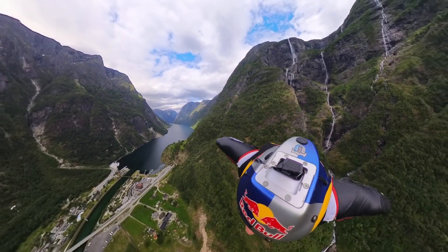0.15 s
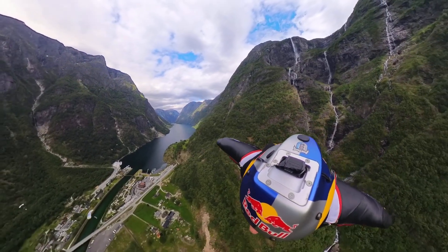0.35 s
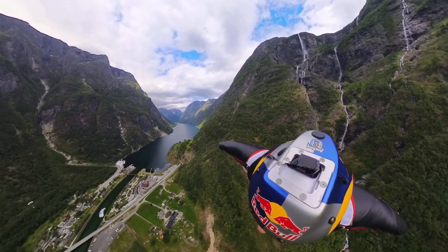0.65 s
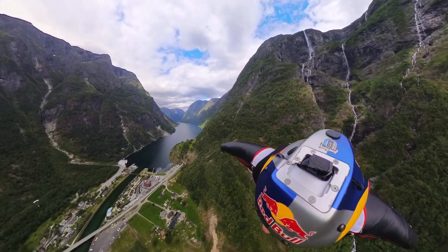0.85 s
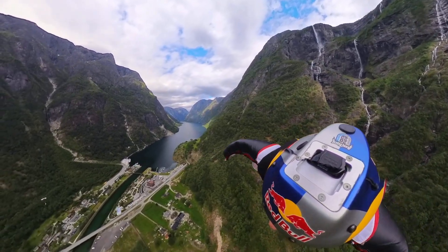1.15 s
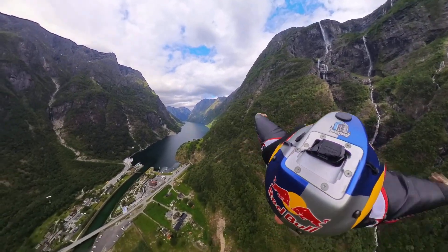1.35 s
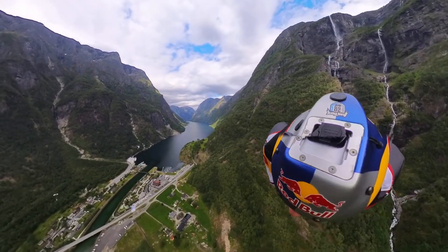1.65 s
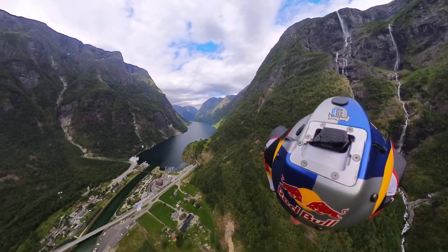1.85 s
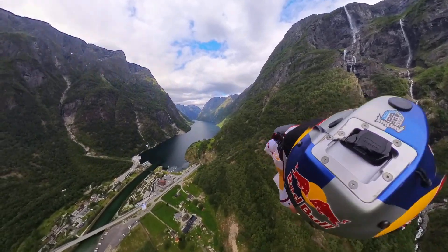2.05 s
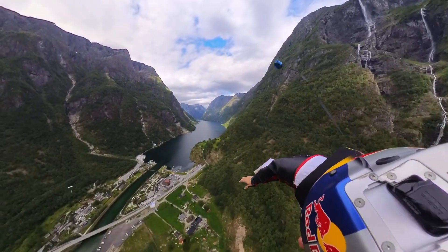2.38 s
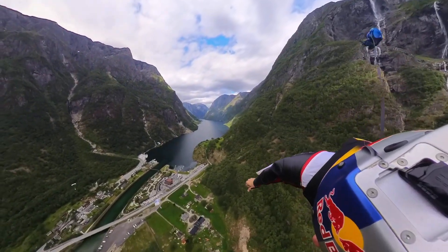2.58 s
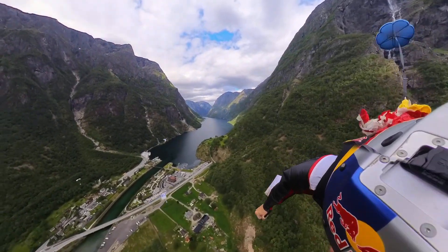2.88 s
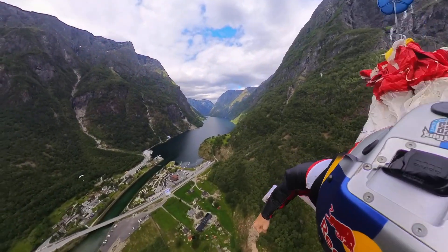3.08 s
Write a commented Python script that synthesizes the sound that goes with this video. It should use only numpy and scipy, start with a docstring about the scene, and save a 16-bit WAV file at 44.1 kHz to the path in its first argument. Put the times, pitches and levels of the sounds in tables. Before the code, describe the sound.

Wind tears past a helmet microphone in open flight, swells to a roar, then abruptly becomes a muffled, throbbing rumble; a short blast follows, then low buffeting, tiny line ticks and snapping parachute cloth.

```python
"""Air tears past a helmet microphone in a wingsuit flight: a bright rush swells to a roar, then drops to a
muffled, throbbing rumble. As the flyer turns to throw the pilot chute the airstream hits the ports in a
short burst and falls away. Slow buffeting follows; lines tick and the canopy rustles and snaps out of its
pack. The air is coloured noise in lumps, the throb a wandering sine, the cloth and lines short clicks."""
import sys
import numpy as np
from scipy import signal
from scipy.fft import rfft, irfft
from scipy.io import wavfile
from scipy.ndimage import uniform_filter1d, map_coordinates

SR = 44100
rng = np.random.default_rng(int(sys.argv[2]) if len(sys.argv) > 2 else 0)


def digitize_waveform(pressure):
    """Quantize a signal to 16-bit integers and store it at the path in sys.argv[1].

    Rows of a 2-D input are taken as channels; values are limited to [-1, 1].
    """
    field = np.atleast_2d(pressure).T
    bounded = np.clip(field, -1, 1)
    quanta = np.round(bounded * 32767).astype(np.int16)
    wavfile.write(sys.argv[1], SR, quanta)


N = 142002
T = np.arange(N) / SR
FREQS = np.maximum(np.arange(N // 2 + 1) * SR / N, 1)

# Every "colour" table is the outline of a filter: relative level against frequency.


def open_wind():
    """Full airstream on the ports: broadband turbulence with a swirling hiss near 4 kHz, deepening to a roar."""
    # airstream level at the ports [t/s, level/dB]
    rush_levels = [(0, -20), (.4, -19), (.735, -19.5), (.765, -21), (.79, -24), (.816, -27.5),
                   (.824, -19.5), (.844, -16.5), (.87, -25.5), (.968, -30.5), (.985, -83.5)]
    hiss_levels = [(0, -32), (.45, -33), (.58, -31), (.66, -28), (.75, -31.5), (.775, -39), (.815, -81),
                   (.845, -26), (.87, -57), (.95, -90)]
    roar_levels = [(.76, -36), (.795, -30), (.817, -29), (.828, -25), (.84, -17.5), (.88, -15.5),
                   (.912, -19), (.927, -19.5), (.969, -20.5), (.978, -33), (.99, -35)]
    # airstream colour [f/Hz, level/dB]
    rush_colour = [(20, -39), (45, -9), (95, -7), (165, 4.5), (300, -3.5), (550, -7.5), (1150, -14),
                   (1600, -22.5), (2400, -21), (4300, -25), (6000, -34), (8500, -40.5), (12500, -37.5),
                   (16000, -44.5)]
    hiss_colour = [(1500, -8.5), (2900, -4.5), (3800, 4), (4450, -2), (5300, -16.5), (7000, -42),
                   (12000, -51)]
    roar_colour = [(20, -35.5), (100, -10.5), (160, -1.5), (400, 1.5), (700, 0.5), (1300, -5), (1600, -11),
                   (2100, -14), (2800, -22), (4500, -27.5), (7000, -39.5), (14000, -47.5), (16000, -72)]
    # centre the port hiss swirls about, sinking as the head turns [t/s, f/Hz]
    hiss_pitch = [(0, 4098), (.3, 4014), (.55, 4102), (.66, 3838), (.76, 3567), (.85, 3450)]

    rush = turbulence(rush_colour, lump_db=1.5, lump_rate=350, steady_s=0.015, width_db=-0.5)
    hiss = turbulence(hiss_colour, lump_db=4.0, lump_rate=38, steady_s=0.013, width_db=-25)
    roar = turbulence(roar_colour, lump_db=1.3, lump_rate=160, steady_s=0.013, width_db=0.5)
    centre_ratio = np.interp(T, *np.transpose(hiss_pitch)) / 3985  # Hz over Hz
    swirl = np.exp(0.05 * drift(12))  # about 5 % either way
    hiss = bend(hiss, centre_ratio * swirl)
    return level(rush_levels) * rush + level(hiss_levels) * hiss + level(roar_levels) * roar


def sheltered_wind():
    """Dull turbulence in the lee of the helmet, with short gusts curling round its edge and a faint hiss."""
    # dull rumble in the lee [t/s, level/dB]
    rumble_levels = [(.955, -55), (.985, -16.5), (1.07, -22), (1.2, -21), (1.45, -22.5), (1.58, -24.5),
                     (1.66, -28.5), (1.73, -26.5), (1.785, -21.5), (1.85, -24.5), (2.0, -21), (2.15, -18),
                     (2.3, -20), (2.425, -16), (2.445, -36), (2.5, -39.5), (2.6, -54)]
    # separate low-mid gusts [t/s, half length/s, level/dB]
    gust_swells = [(1.097, 0.031, -33.5), (1.178, .025, -28.5), (1.342, 0.023, -31), (1.42, 0.043, -27),
                   (1.545, 0.039, -27.5), (1.632, 0.032, -32), (1.767, 0.035, -30.5), (1.9, 0.012, -30),
                   (2.223, .02, -24)]
    # faint high hiss of air sliding over the helmet [t/s, level/dB]
    skin_levels = [(.97, -67), (1.1, -65), (1.4, -66), (1.68, -67.5), (1.9, -70), (2.2, -68.5), (2.42, -71),
                   (2.45, -85)]
    # colour of rumble, gusts and hiss [f/Hz, level/dB]
    rumble_colour = [(20, -33.5), (50, -8), (90, 1), (170, 4.5), (280, -1.5), (480, -8.5), (700, -15.5),
                     (1000, -25), (1400, -33.5), (1600, -42), (2100, -43.5), (3000, -54), (6500, -64),
                     (16000, -67.5)]
    gust_colour = [(120, -27.5), (280, -8), (400, 6.5), (600, -6.5), (800, -20), (1400, -32), (3000, -62),
                   (9000, -91.5)]
    skin_colour = [(1200, -12), (2500, -2), (4200, -3.5), (6500, -8), (16000, -10)]

    rumble = turbulence(rumble_colour, lump_db=0.5, lump_rate=55, steady_s=0.02, width_db=1.0)
    gusts = turbulence(gust_colour, lump_db=3.0, lump_rate=100, steady_s=0.014, width_db=1.5)
    skin = turbulence(skin_colour, lump_db=1.5, lump_rate=90, steady_s=0.04, width_db=-1.0)
    swells = np.zeros(N)
    for centre_s, half_s, db in gust_swells:
        swells += from_db(db) * np.exp(-0.5 * ((T - centre_s) / half_s) ** 2)
    return level(rumble_levels) * rumble + swells * gusts + level(skin_levels) * skin


def eddy_throb():
    """Nearly regular vortex shedding by the helmet: a low tone, unsteady in pitch and level."""
    # shed eddies: pitch before wander, level before the overall lift [t/s, f/Hz, level/dB]
    eddies = [(.94, 151.9, -40), (.985, 148.8, -22.5), (1.072, 138.7, -17), (1.12, 124.5, -29),
              (1.24, 131.6, -18.5), (1.4, 121.4, -27.5), (1.5, 134.4, -18.5), (1.551, 125.2, -31),
              (1.618, 118.5, -19.5), (1.698, 104.4, -22.5), (1.765, 117.9, -24), (1.805, 142, -25.5),
              (1.86, 114, -17), (1.91, 129.4, -24), (1.979, 125.6, -22), (2.024, 110.6, -20),
              (2.069, 123, -19.5), (2.15, 118.6, -24.5), (2.231, 133.4, -20), (2.31, 166.6, -30),
              (2.358, 143.3, -38), (2.425, 138.6, -18), (2.446, 131.5, -35)]
    s, hz, db = np.transpose(eddies)
    wander = np.exp(0.15 * drift(44.1))
    phase = 2 * np.pi * np.cumsum(np.interp(T, s, hz) * wander) / SR
    swing = rms_one(from_db(3 * np.tanh(drift(29))))
    tone = np.sqrt(2) * np.sin(phase)  # unit power
    lift = from_db(2)
    return lift * level(np.c_[s, db]) * swing * tone


def burst():
    """The airstream sweeps across the ports during the throw: fine spray of hiss, then the full blast."""
    # burst level [t/s, level/dB]
    spray_levels = [(2.21, -86), (2.232, -54.5), (2.275, -41.5), (2.31, -46.5), (2.317, -33.5),
                    (2.338, -30.5), (2.352, -37.5), (2.39, -49), (2.41, -68)]
    blast_levels = [(2.23, -75), (2.28, -32.5), (2.305, -31.5), (2.33, -17.5), (2.358, -16.5),
                    (2.39, -17.5), (2.406, -24.5), (2.424, -27), (2.44, -40), (2.465, -60.5)]
    # burst colour [f/Hz, level/dB]
    spray_colour = [(500, -30), (2000, -8), (4000, 3), (7000, 1.5), (10000, 0), (15500, -1)]
    blast_colour = [(20, -12), (90, -14.5), (180, 7), (500, -0.5), (1300, -8.5), (1600, -12.5),
                    (2700, -16.5), (4200, -25), (7000, -36), (16000, -62)]
    # the blast darkens as the airstream slides off the ports [t/s, pitch ratio]
    blast_sink = [(2.33, 1.08), (2.39, 1.0), (2.405, .84), (2.44, 0.77)]

    spray = turbulence(spray_colour, lump_db=1.5, lump_rate=300, steady_s=0.02, width_db=-11.5)
    blast = turbulence(blast_colour, lump_db=2.5, lump_rate=180, steady_s=0.023, width_db=-1.0)
    blast = bend(blast, np.interp(T, *np.transpose(blast_sink)))
    return level(spray_levels) * spray + level(blast_levels) * blast


def wake():
    """Deep buffeting turbulence and the low flutter of the suit as the body swings upright."""
    # wake level [t/s, level/dB]
    buffet_levels = [(2.43, -37), (2.49, -38), (2.54, -22.5), (2.65, -24.5), (2.76, -27), (2.87, -18),
                     (2.93, -30), (2.98, -22.5), (3.05, -22.5), (3.12, -33), (3.185, -12.5), (3.22, -18)]
    flutter_levels = [(2.43, -63), (2.495, -34), (2.508, -29), (2.57, -25), (2.61, -22), (2.75, -16),
                      (2.8, -19), (2.86, -19.5), (2.93, -21), (2.97, -15), (3.01, -21.5), (3.11, -18),
                      (3.16, -15.5), (3.22, -24)]
    # wake colour [f/Hz, level/dB]
    buffet_colour = [(20, -30), (38, -1), (55, -2), (90, -6.5), (160, -24.5), (400, -33), (2000, -89.5),
                     (8000, -120)]
    flutter_colour = [(40, -21), (100, -1.5), (150, 4.5), (220, -4.5), (300, -14.5), (450, -24.5),
                      (800, -38.5), (1400, -52), (1700, -57), (3000, -73), (5000, -82), (8000, -97),
                      (12000, -115)]

    buffet = turbulence(buffet_colour, lump_db=2.0, lump_rate=41, steady_s=0.08, width_db=7.0)
    flutter = turbulence(flutter_colour, lump_db=2.5, lump_rate=64, steady_s=0.024, width_db=-2.0)
    return level(buffet_levels) * buffet + level(flutter_levels) * flutter


def canopy():
    """Cloth crackles out of the pack as creases open, and folds snap taut with a bright edge and a body."""
    # canopy fabric before its uneven flapping [t/s, level/dB]
    rustle_levels = [(2.91, -54.5), (2.94, -48.5), (2.995, -51), (3.01, -37.5), (3.047, -39), (3.058, -34),
                     (3.072, -37), (3.11, -29), (3.16, -29), (3.22, -25.5)]
    # folds snapping taut: click level before colour [t/s, level/dB, body relative to edge/dB]
    snaps = [(2.975, -35.5, -11), (2.996, -33, -10), (3.0018, -23, 0.5), (3.0052, -19, 4.5),
             (3.010, -21, 5.5), (3.0215, -21.5, 6), (3.0278, -20, 7.5), (3.0305, -22, 1.5),
             (3.039, -18.5, 6.5), (3.0427, -27.5, 2), (3.0572, -17, 5), (3.062, -16.5, 4.5),
             (3.0682, -21.5, -2), (3.0762, -22.5, -4), (3.085, -18, 2), (3.1003, -17.5, 4.5),
             (3.1485, -19, 3.5), (3.155, -19.5, -1), (3.1632, -16, -5), (3.185, -17, 5.5),
             (3.1965, -12.5, 1.5), (3.21, -16, 7)]
    # cloth colour [f/Hz, level/dB]
    rustle_colour = [(150, -0.5), (550, 0), (900, -6.5), (1400, -9), (1600, -17), (2200, -16.5),
                     (4200, -24.5), (7000, -41.5), (10000, -65.5), (16000, -91)]
    snap_colour = [(200, 4), (900, 7), (2000, 0), (5000, -10.5), (7000, -30.5), (9500, -39), (16000, -77)]

    s, db, body_db = np.transpose(snaps)
    split_hz = 2910  # body below, edge above
    above = signal.butter(3, split_hz, "high", fs=SR, output="sos")
    below = signal.butter(3, split_hz, "low", fs=SR, output="sos")
    edge = signal.sosfilt(above, crack(s, db, snap_colour))
    body = signal.sosfilt(below, crack(s, db + body_db, snap_colour))

    rustle = crackle(rustle_colour, per_s=650, spread_db=2.5, hiss_db=-1.5, width_db=2.5)
    flapping = rms_one(from_db(2.5 * np.tanh(drift(60))))  # the unfolding cloth flaps unevenly
    return edge + body + level(rustle_levels) * rustle * flapping


def lines():
    """The bridle pays out with a fine ticking of lines and fabric; single lines pull free with bright clicks."""
    # faint ticking [t/s, level/dB]
    ticking_levels = [(2.47, -88), (2.56, -78), (2.66, -75), (2.9, -74), (2.95, -70.5), (3.0, -69.5)]
    # thin ticks of lines pulling free: click level before colour [t/s, level/dB]
    line_ticks = [(2.555, -52), (2.602, -48.5), (2.6557, -38.5), (2.6755, -45), (2.717, -39),
                  (2.8455, -39.5), (2.9393, -38.5), (2.9553, -30), (3.0172, -26.5), (3.126, -22.5)]
    # colour of the ticking and of the single lines [f/Hz, level/dB]
    tick_colour = [(800, -24), (2500, 0), (4800, 0), (6500, -9), (8000, -20), (12000, -43)]
    line_colour = [(1000, -29), (2600, -8.5), (4000, 1), (5500, -5), (7000, -11.5), (9000, -20.5),
                   (12000, -45), (16000, -70)]

    ticking = crackle(tick_colour, per_s=170, spread_db=2.5, hiss_db=3.0, width_db=1.5)
    return level(ticking_levels) * ticking + crack(*np.transpose(line_ticks), line_colour)


def turbulence(colour, lump_db, lump_rate, steady_s, width_db):
    """Noise in quick lumps as eddies cross the ports; its power, smoothed over about steady_s, is held near 1."""
    lumps = from_db(lump_db * np.clip(drift(lump_rate), -2.5, 2.5))
    mid, side = rng.standard_normal((2, N)) * lumps
    air = coloured(stereo(mid, side, width_db), colour)
    size = max(int(steady_s * SR), 2)
    power = np.mean(air ** 2, axis=0)
    for _ in range(2):
        power = uniform_filter1d(power, size)
    return air / np.sqrt(power + 1e-20)


def crack(s, db, colour):
    """A sharp click with a short, decaying crackle at each time, as tension is released."""
    clicks = np.zeros(N)
    clicks[np.clip((s * SR).astype(int), 0, N - 1)] = from_db(db)
    decay_s = 0.00023
    decay = signal.lfilter([1], [1, -np.exp(-1 / (decay_s * SR))], clicks + 1e-18)
    grain = 0.15 * decay * rng.standard_normal((2, N))
    mid, side = 2 * clicks + grain
    side = side * rng.choice([-1, 1], N)  # each click leans to either port
    return coloured(stereo(mid, side, width_db=-4.0), colour)


def crackle(colour, per_s, spread_db, hiss_db, width_db):
    """Separate tiny clicks of uneven size at random times over a hiss; unit power."""
    born = rng.random(N) < per_s / SR
    sizes = from_db(spread_db * np.clip(rng.standard_normal(N), -2, 1.5))
    clicks = rms_one(born * sizes) * rng.choice([-1, 1], (2, N))
    hiss = from_db(hiss_db) * rng.standard_normal((2, N))
    mid, side = clicks + hiss
    return rms_one(coloured(stereo(mid, side, width_db), colour))


def stereo(mid, side, width_db):
    """Two close microphone ports: alike in the bass, apart in the treble."""
    # spacing of the ports, before width_db is added [f/Hz, side minus mid/dB]
    port_width = [(2950, -72.5), (3150, -3.5), (4500, -7.5), (6000, -5), (8500, -0.5), (13000, -2.5)]
    return mid + from_db(width_db) * coloured(side, port_width) * np.array([[1], [-1]])


def bend(x, ratio):
    """Shift every frequency of a stereo noise by a changing ratio, by reading it faster or slower."""
    place = np.cumsum(ratio) % (N - 1)
    return np.array([map_coordinates(port, [place], order=3) for port in x])


def coloured(x, colour):
    """Filter by an outline of (Hz, dB) points joined along log frequency."""
    hz, db = np.transpose(colour)
    gain = from_db(np.interp(np.log(FREQS), np.log(hz), db))
    return irfft(rfft(x) * gain, N)


def drift(rate):
    """Smooth random motion of unit power: noise whose spectrum falls to half at rate (Hz)."""
    spectrum = rfft(rng.standard_normal(N))
    return rms_one(irfft(spectrum / (1 + (FREQS / rate) ** 2), N))


def level(rows):
    """Gain from (s, dB) rows, dying away at 1 dB per ms outside them, down by 150 dB at most."""
    s, db = np.transpose(rows)
    outside_s = np.abs(T - np.clip(T, s.min(), s.max()))
    return from_db(np.interp(T, s, db) - np.minimum(1000 * outside_s, 150))


def rms_one(x):
    """Scale to unit power."""
    return x / np.sqrt(np.mean(x ** 2) + 1e-20)


def from_db(db):
    """Decibels to gain."""
    return 10 ** (np.asarray(db) / 20)


def scene():
    """All of the air and cloth at the helmet."""
    return open_wind() + sheltered_wind() + eddy_throb() + burst() + wake() + canopy() + lines()


def record(dry):
    """The recorder rounds the highest peaks toward a ceiling and cuts the top steeply."""
    ceiling, cutoff_hz = 0.63, 15800
    rounded = dry / (1 + (dry / ceiling) ** 6) ** (1 / 6)
    lowpass = signal.ellip(12, 0.1, 80, cutoff_hz, fs=SR, output="sos")
    return signal.sosfilt(lowpass, rounded)


dry = scene()
out = record(dry)
digitize_waveform(out)
```